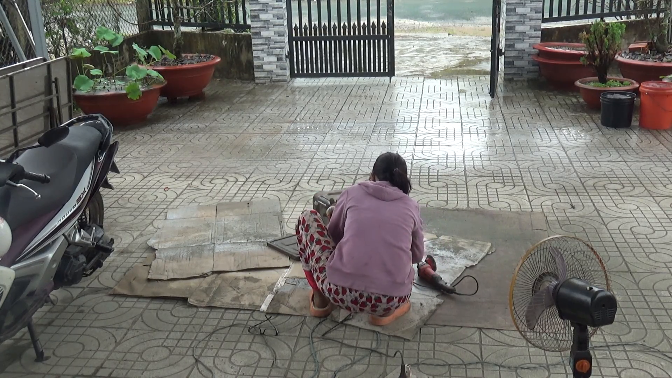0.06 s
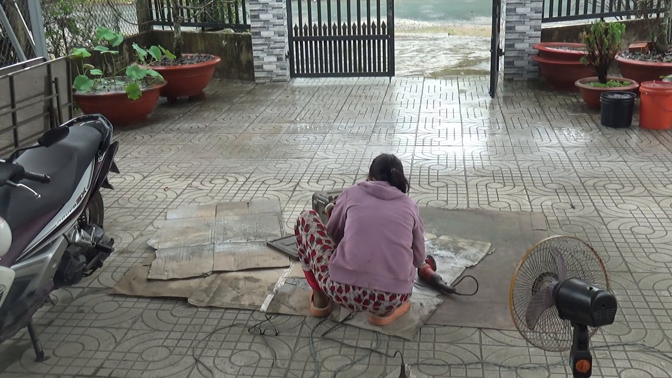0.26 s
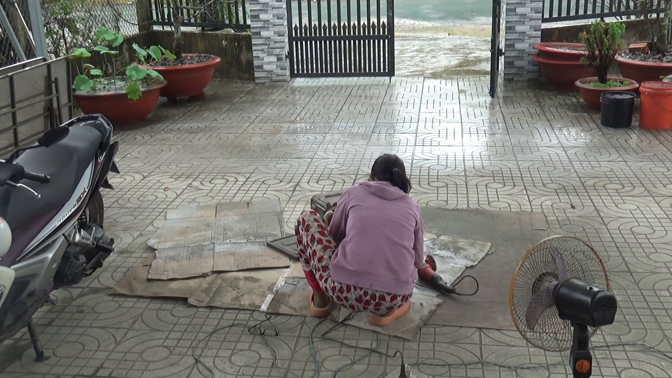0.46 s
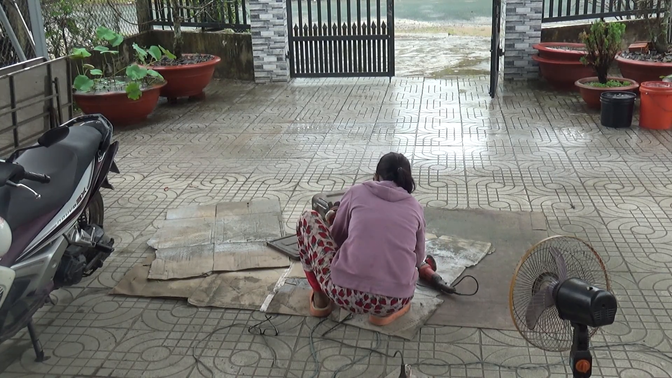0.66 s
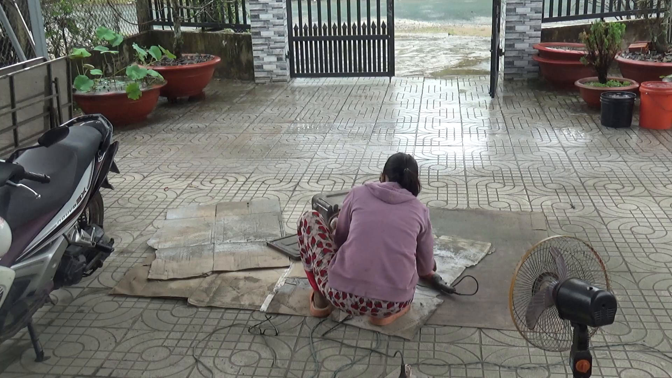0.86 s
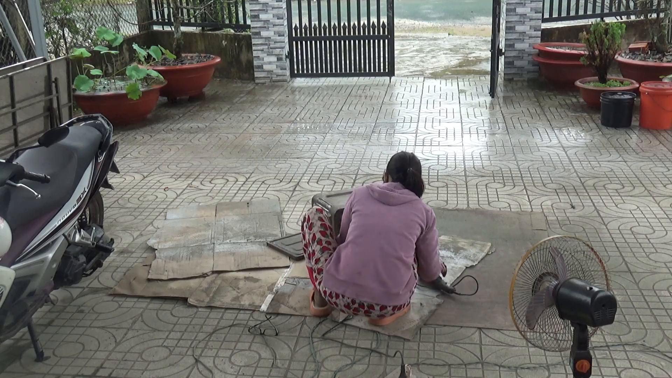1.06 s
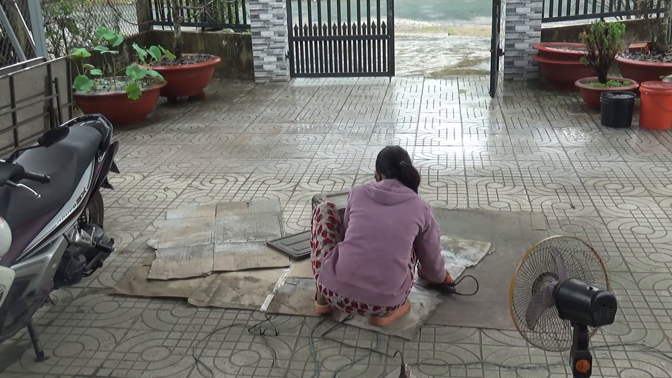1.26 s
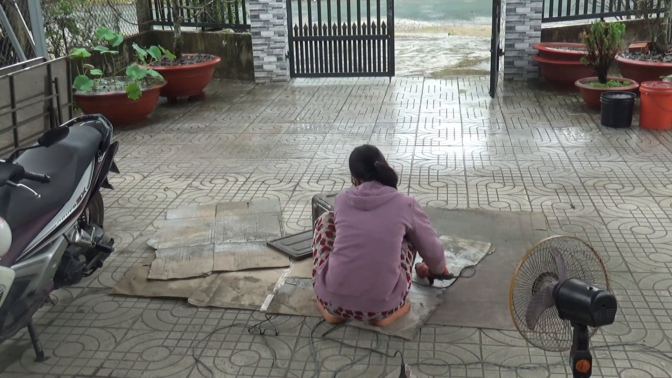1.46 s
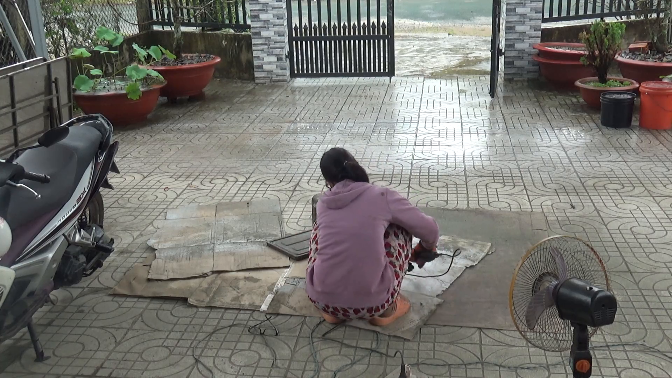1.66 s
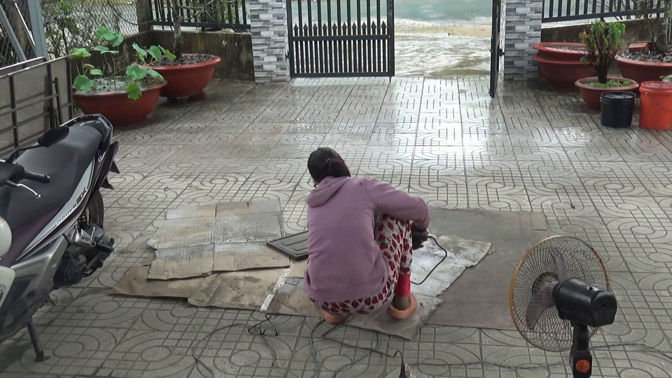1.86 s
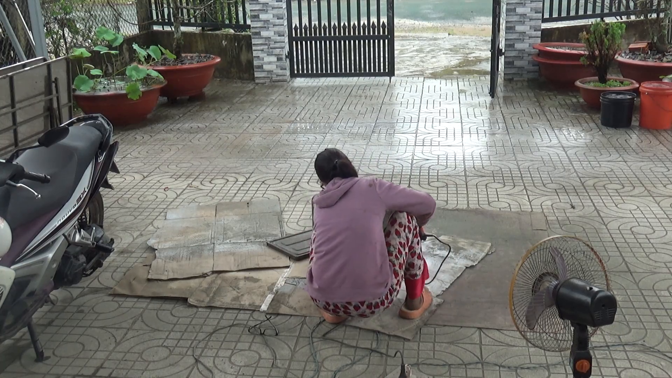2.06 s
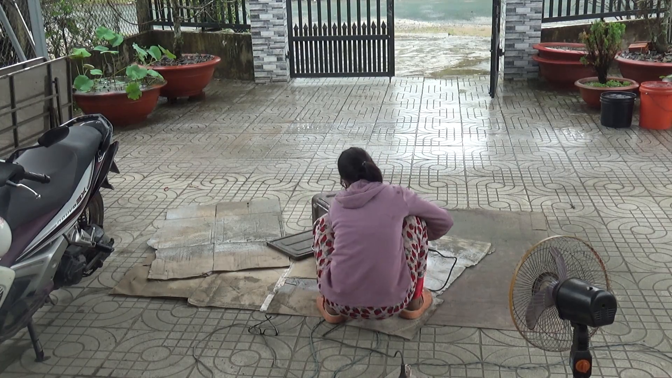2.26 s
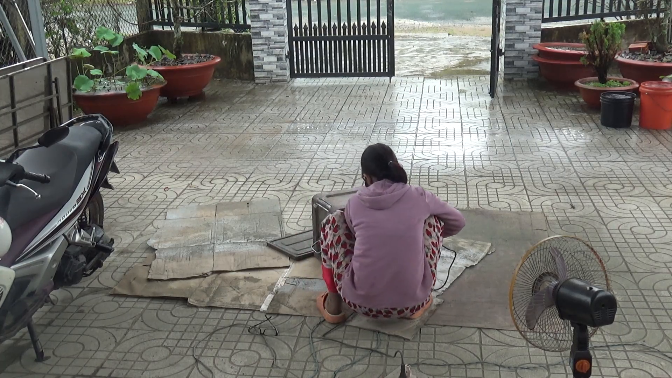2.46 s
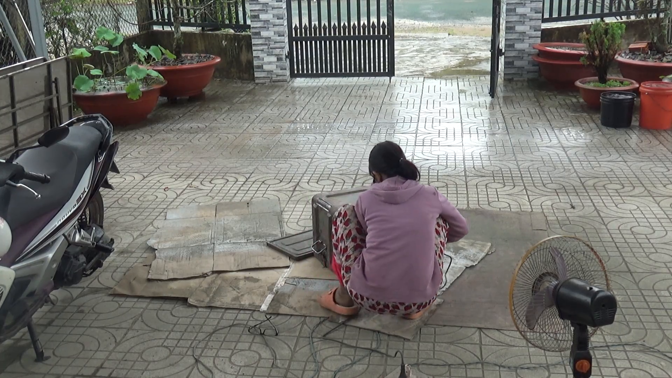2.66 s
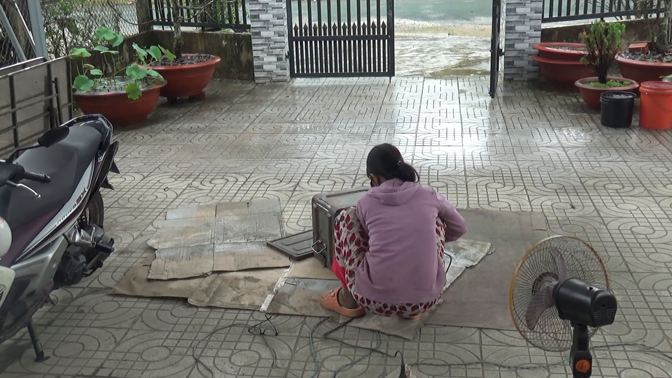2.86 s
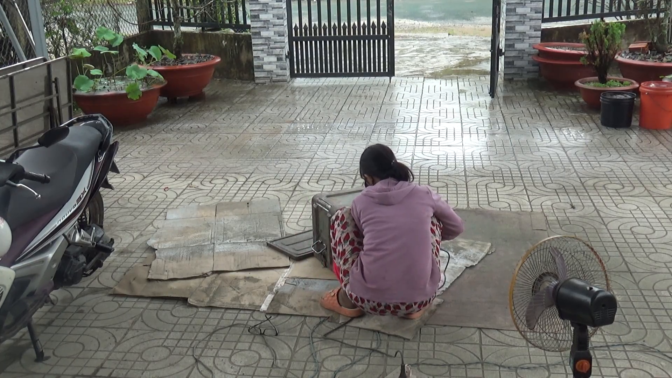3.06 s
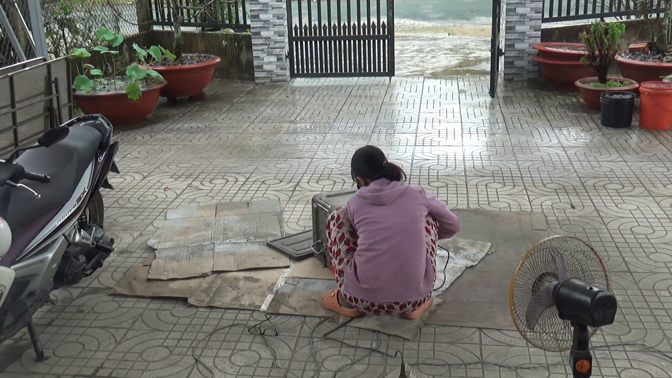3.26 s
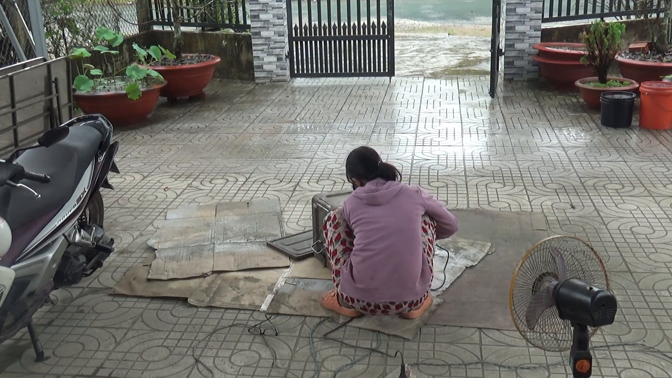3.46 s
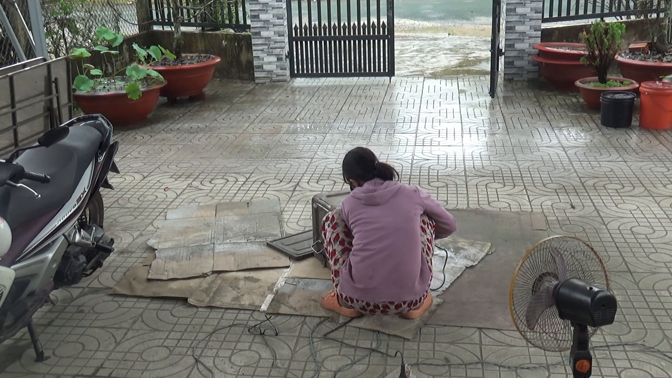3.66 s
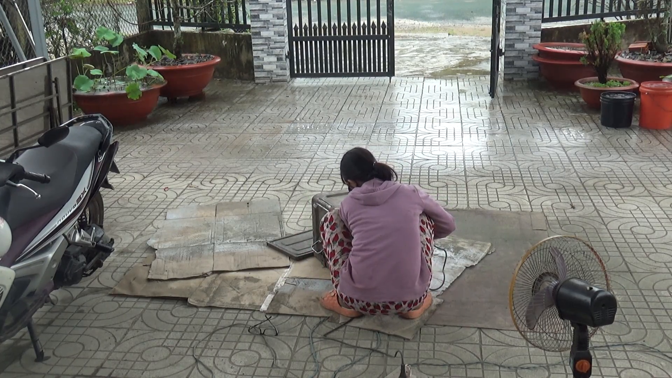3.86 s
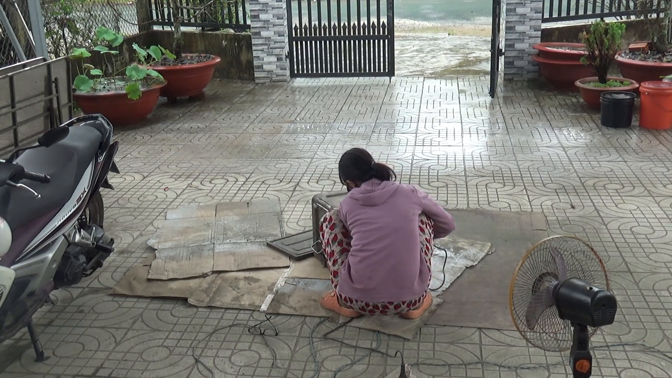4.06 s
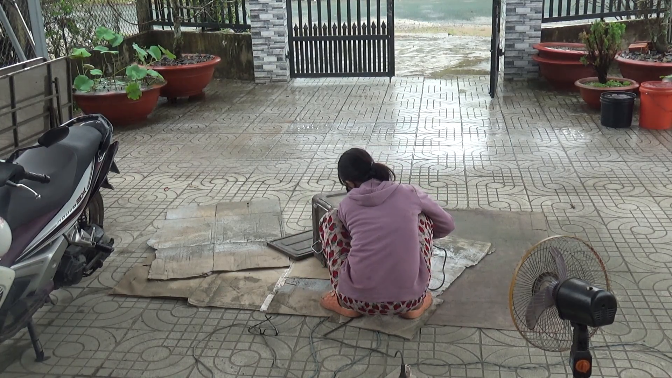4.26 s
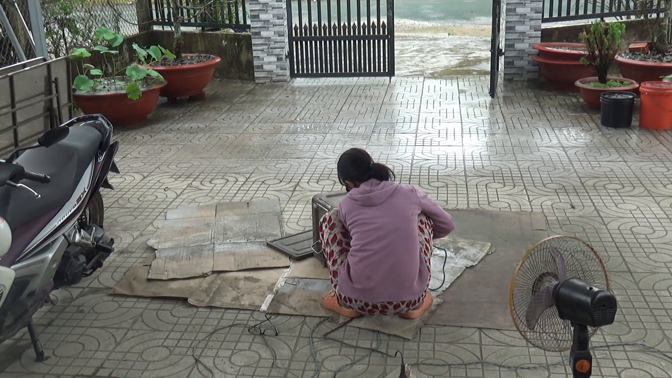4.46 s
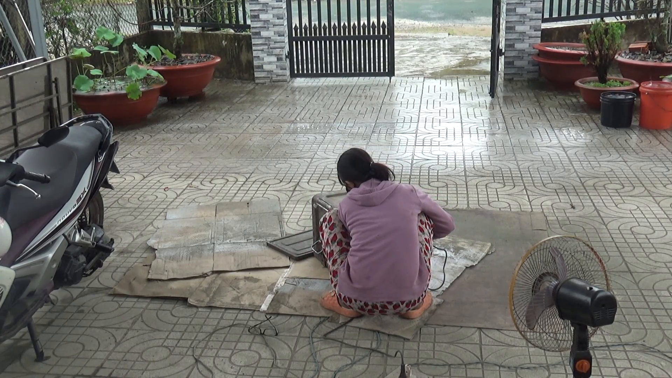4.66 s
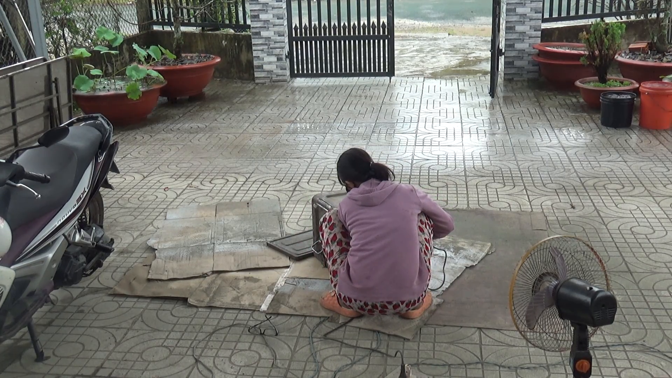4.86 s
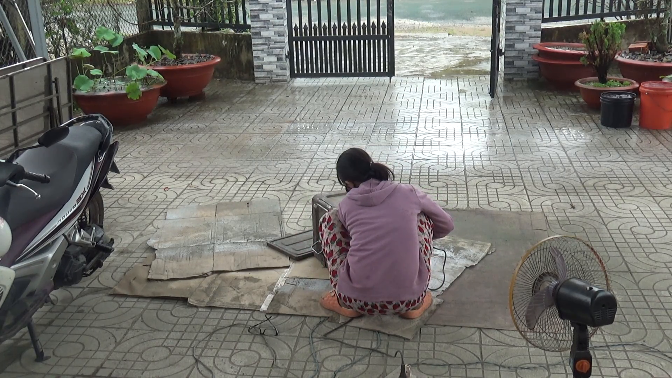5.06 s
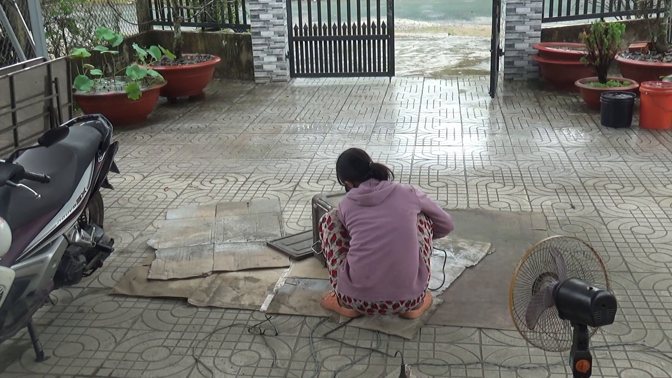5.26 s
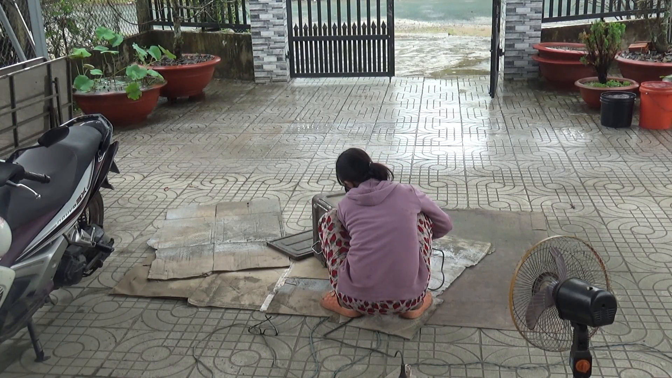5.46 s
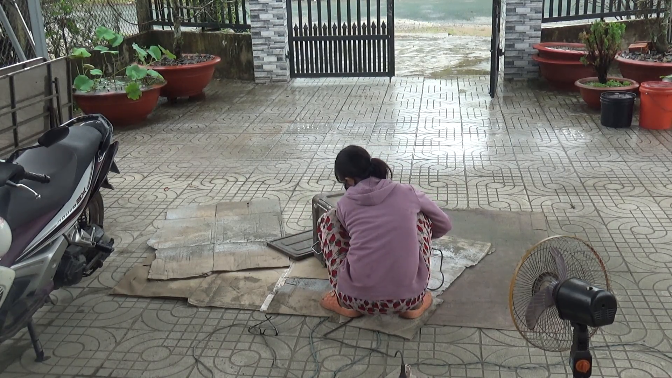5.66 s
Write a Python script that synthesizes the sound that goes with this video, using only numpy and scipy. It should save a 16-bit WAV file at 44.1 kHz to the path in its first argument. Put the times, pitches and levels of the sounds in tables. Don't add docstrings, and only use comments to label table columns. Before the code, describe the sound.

In a tiled yard, metal knocks and shuffling lead to a grinder starting, whining steadily, then biting steel with gritty, sagging bursts.

```python
import sys
import numpy as np
from scipy import signal
from scipy.fft import rfft, irfft, next_fast_len
from scipy.io import wavfile
from scipy.ndimage import uniform_filter1d, map_coordinates

SR = 44100
rng = np.random.default_rng(int(sys.argv[2]) if len(sys.argv) > 2 else 0)


def to_wav(s):
    ch = np.atleast_2d(s).T
    pcm = np.round(np.clip(ch, -1, 1) * 32767)
    wavfile.write(sys.argv[1], SR, pcm.astype(np.int16))


def ratio(d):
    e = np.asarray(d, float) / 20
    return 10 ** e


N = 251811
TIME_S = np.arange(N) / SR
GEAR = 31 / 10
TOUCH_S = 3.595


def unit(x):
    return x / np.sqrt(np.mean(x ** 2) + 1e-20)


def noise():
    return rng.standard_normal(N)


def along(points, hz):
    point_hz, value = np.transpose(points)
    return np.interp(np.log(hz + 1), np.log(point_hz + 1), value)


def curves(rows):
    s, *columns = np.transpose(rows)
    return [np.interp(TIME_S, s, column, -120) for column in columns]


def wobble(rate):
    return map_coordinates(rng.standard_normal(N // 32), [TIME_S * rate])


def filtered(x, response):
    m = next_fast_len(N + SR // 2)
    return irfft(rfft(x, m) * response(np.fft.rfftfreq(m, 1 / SR)), m)[..., :N]


def band(f, lo_hz, hi_hz):
    low_cut = 1 + np.sqrt(2) * lo_hz / (1j * f + 1e-9) - (lo_hz / (f + 1e-9)) ** 2
    high_cut = 1 + np.sqrt(2) * 1j * f / hi_hz - (f / hi_hz) ** 2
    return 1 / low_cut / high_cut


def modes(f, rows):
    total = 0
    for k, (hz, width, db) in enumerate(rows):
        total = total + (-1) ** k * ratio(db) * 1j * f * width / (hz * hz - f * f + 1j * f * width)
    return total


def patchy(x, depth_db, bins=6, frames=12):
    z = signal.stft(x, nperseg=512)[2]
    field = uniform_filter1d(rng.standard_normal(z.shape), bins, 0)
    field = uniform_filter1d(field, frames, 1)
    return signal.istft(z * ratio(depth_db * unit(field)), nperseg=512)[1][:N]


def split(x, colour, edges_hz, levels_db, order=14):
    def above(f, edge):
        return 1 / np.sqrt(1 + (edge / (f + 1)) ** order)

    def cut(lo, hi):
        return lambda f: colour(f) * above(f, lo) * above(hi, f)

    bands = zip(edges_hz, edges_hz[1:], levels_db)
    return sum(ratio(db) * unit(filtered(x, cut(lo, hi))) for lo, hi, db in bands)


def tone(turns, order, db, flutter_db=2, blur=0.23):
    level = np.sqrt(2) * ratio(db + flutter_db * wobble(18))
    return level * np.sin(2 * np.pi * order * turns + blur * wobble(40))


def gestures(s, db, rise_s, fall_s, hold_s=0):
    s, db, fall_s, hold_s = [np.reshape(v, (-1, 1)) for v in (s, db, fall_s, hold_s)]
    t = np.arange(0, N + 32, 32) / SR - s
    drop = np.maximum(-t, 0) / rise_s + np.maximum(t - hold_s, 0) / fall_s
    power = np.sum(ratio(db - 60 * drop) ** 2, axis=0)
    return np.interp(np.arange(N) / 32, np.arange(len(power)), 10 * np.log10(power + 1e-14))


# start_s, spindle_hz, shake_db
SPINDLE = [(2.34, 29.55, -76), (2.46, 81.5, -84), (2.6, 112.4, -66), (2.72, 126.2, -67), (2.84, 133.4, -67),
           (2.96, 141.5, -58), (3.16, 148.3, -54.5), (3.43, 155.1, -48), (3.6, 157.1, -51.5),
           (3.8, 151.7, -45), (4.04, 151.4, -48.5), (4.28, 150.9, -53.5), (4.76, 154.4, -47),
           (5.07, 148.2, -38.5), (5.28, 145, -44), (5.38, 138.1, -51), (5.63, 126.8, -51), (5.7, 127, -35)]


def spindle():
    speed, shake = curves(SPINDLE)
    speed = uniform_filter1d(np.clip(speed, 0, None), round(0.08 * SR), mode="nearest")
    return speed, np.cumsum(speed) / SR, shake


# mode_hz, width_hz, swell_db
ORDER_SWELLS = [(253, 7.7, 13), (271, 8.6, 16), (862.5, 29.5, 13.5), (908.6, 29, 11), (958, 31, 20.5),
                (1032.6, 32, 18)]
# mode_hz, width_hz, swell_db
ARMATURE_SWELLS = [(450.4, 11, 9)]


def order_levels(speed, shake):
    def swell(order, rows):
        return sum(db / (1 + (2 * (order * speed - hz) / width) ** 4) for hz, width, db in rows)

    running = np.where(TIME_S > SPINDLE[0][0], 0, -120)
    touch = TIME_S > TOUCH_S
    labour = touch * np.clip((141.5 - speed) / 5, 0, 1)
    armature = -47.5 + 0.14 * (speed - 150) + swell(GEAR, ARMATURE_SWELLS)
    armature = armature - 0.6 * np.clip(110 - speed, 0, None) - 5 * labour
    rough_db = 5.5
    second = -62 + 0.5 * (shake + 50) + touch * swell(1.995, ORDER_SWELLS) + rough_db * wobble(7)
    sixth = -56 + swell(6, ORDER_SWELLS) + rough_db * wobble(9)
    sag_hz = np.clip(150 - speed, 0, 15)
    seventh = -57 + 0.5 * sag_hz + swell(7, ORDER_SWELLS) + rough_db * wobble(9)
    return [running + db for db in (second, armature, sixth, seventh)]


# start_s, effort_db
EFFORT_CURVE = [(2.34, -56), (2.355, -43), (2.4, -36), (2.45, -30), (2.59, -32), (3.49, -31), (3.65, -28),
                (4.07, -30), (4.14, -25.5), (4.24, -31.5), (4.6, -30.5), (5.19, -25.5), (5.39, -27),
                (5.52, -30.5), (5.59, -27.5), (5.71, -32)]


def motor_levels(speed):
    gears, = curves(EFFORT_CURVE)
    since_s = np.clip(TIME_S - EFFORT_CURVE[0][0], 0, None)
    start = 20 * np.log10(1 - np.exp(-since_s / 0.0082) + 1e-6)
    effort = np.clip(gears + 30, -6, None)
    housing = -35.5 + 0.14 * np.clip(speed - 150, -60, 0) + 0.47 * effort + start
    air = -33.5 + 0.24 * effort + start
    hiss = -38 + 0.31 * effort + start
    return housing, air, gears, hiss


# tone_hz, level_db
MOTOR_COLOUR = [(35, -64), (60, -36), (142, -15), (197, -22), (404, -15.5), (465, -9), (535, -6.5),
                (1050, -2.5), (1320, 0), (1560, -9), (2600, -5.5), (3860, -6), (4440, -2.5), (8720, -12.5),
                (15600, -22)]
# mode_hz, width_hz, level_db
CASING_MODES = [(248, 10.54, 5), (1360, 150, -13.5), (1975, 45, -1.5), (2440, 500, -4), (5140, 9.8, 6.5),
                (6035, 5, 13), (8750, 49, -7)]
# start_s, level_db
FAN_WHINE = [(2.55, -80), (2.64, -56), (2.74, -46), (2.9, -57), (3.15, -54), (3.5, -61), (3.7, -72),
             (5.7, -74)]


def motor(speed, turns, armature_db):
    housing, air, gears, hiss = motor_levels(speed)

    def colour(f):
        return ratio(along(MOTOR_COLOUR, f)) * (1 + abs(modes(f, CASING_MODES)))

    top = hiss - 8 + 0.16 * (speed - 150)
    levels = [housing - 1, air, gears - 3, hiss, top]
    rush = split(patchy(noise(), 0.64), colour, [60, 1650, 3500, 5500, 9000, 18000], levels)
    lines = tone(turns, GEAR, armature_db)
    lines = lines + tone(turns, 2 * GEAR, np.minimum(armature_db, -47) - 1, 0.8)
    lines = lines + tone(turns, 5 * GEAR, armature_db / 2 - 27, 3.3)
    mesh = tone(turns, 31, gears - 11, 4, 0.7)
    mesh = mesh + tone(turns, 31, gears - 5, 0, 0) * unit(wobble(450))
    mesh = mesh + tone(turns, 62, gears - 3, 0, 0) * unit(wobble(900))
    gearbox = lambda f: modes(f, [(4700, 2300, 0)]) * band(f, 1660, 10500) ** 2
    whine = tone(turns, 31 * GEAR, curves(FAN_WHINE)[0], 2.5, 0.7)
    return rush + lines + filtered(mesh, gearbox) + whine


# start_s, hold_s, panel_db, grit_over_panel_db, sparkle_over_panel_db
BITES = [
    (3.631, 0.092, -27, 5, -17),
    (3.766, .03, -34, 4.5, 2),
    (3.955, 0.027, -28, -4.5, -1),
    (4.102, 0.056, -28, 4.5, -9),
    (4.376, 0.051, -30.5, 7.5, -22),
    (4.63, 0.074, -41, -9, -5),
    (4.9, 0.075, -32, -34, -29),
    (5.315, 0.042, -19.5, 0, -27),
    (5.409, .03, -21, -11, -9),
    (5.587, 0.039, -21, -9, -11),
]
# panel_db, grit_db, sparkle_db
RESTING_DB = [-34.5, -58, -46.5]


def contact():
    s, hold, panel, grit, sparkle = np.transpose(BITES)
    landing = np.clip(60 * (TIME_S - TOUCH_S) / 0.16, None, 0)
    levels = []
    for over, rest in zip([0, grit, sparkle], RESTING_DB):
        moves = gestures([*s, s[0]], [*(panel + over), rest], 0.38, 0.48, [*hold, 9])
        levels.append(landing + moves)
    return levels


def surface(turns, memory, size=300):
    fresh = rng.standard_normal((700, size))
    rim = signal.lfilter([1], [1, -memory], fresh, axis=0)
    return map_coordinates(rim.ravel(), [(turns + 30) * size])


# tone_hz, level_db
GRIND_COLOUR = [(5000, -4.5), (5900, -5), (6900, -4.5), (8000, -3.5), (9500, -1), (10800, 4.5), (12400, 8),
                (13100, 2.5), (14300, 5), (15000, 5), (15800, -21)]
# mode_hz, width_hz, level_db
PANEL_MODES = [(5830, 25, 7), (5920, 25, 5), (6440, 25, 3), (6650, 30, 3), (6820, 30, 6), (7200, 30, 3),
               (9317, 25, 5), (9861, 20, 5), (10210, 20, 5), (10434, 18, 5), (10817, 30, 6), (11078, 20, 5),
               (11973, 20, 5), (12197, 30, 6), (12490, 40, 6), (14100, 30, 2), (14500, 40, 2)]


def disc(speed, turns, first, second, sixth, seventh):
    levels = contact()
    touch = levels[0] > -60
    beat = tone(turns, 0.99, first) + tone(turns, 2, second)
    beat = beat + touch * (tone(turns, 6, sixth) + tone(turns, 7, seventh))
    load = (np.maximum(sixth, seventh) + np.minimum(first, -44)) / 2
    for order, db in [(4, -4.5), (5, -5.5), (8, 1), (9, -7), (11, -2), (12, -2.5)]:
        beat = beat + touch * tone(turns, order, load + db, 2.1)
    bite = ratio(0.37 * np.cos(2 * np.pi * turns) + 0.25 * wobble(30))
    kept = np.clip((speed - 128) / 22, 0.3, 1)
    rim = kept * unit(surface(turns, memory=0.7)) + np.sqrt(1 - kept ** 2) * noise()
    grit = patchy(bite * rim, 1.3, bins=16, frames=20)

    def colour(f):
        return ratio(along(GRIND_COLOUR, f)) * (1 + abs(modes(f, PANEL_MODES)))

    return beat + split(grit, colour, [5150, 8310, 13050, 18000], levels)


def switch():
    t = TIME_S - 2.3415
    snap = (t > 0) * ratio(-25 - 60 * np.abs(t) / 0.027) * noise()
    return filtered(snap, lambda f: band(f, 260, 6400) ** 2)


# mode_hz, width_hz, level_db
BOX_MODES = [(253, 20, 0), (355, 18, -8), (480, 18, -5), (544, 28, 2), (615, 12, -5), (760, 20, -9),
             (958, 25, 0), (1130, 18, -1), (1300, 70, -8), (1970, 40, -10), (2300, 120, -14)]


def steel(f):
    return (modes(f, BOX_MODES) + 0.13 * band(f, 300, 1300)) * band(f, 170, 6000)


# start_s, level_db, dies_s, boom_over_level_db, scrape_over_level_db
BOX_MOVES = [(.07, -38.5, .5, -22, -12), (.092, -32, 0.27, -18, -20), (0.107, -25, 0.29, -18, -5),
             (.15, -36.5, 0.64, -14, 0.5), (.275, -39, 0.23, -22, -7), (.368, -46, 0.67, -11, -18),
             (.42, -55, .3, 5, -7), (0.452, -39, 0.52, 0.5, -7), (.5, -39, 0.94, -14, -11),
             (.57, -49, 0.42, -3, -8), (.702, -49, 0.68, -5, -2.5)]
# tone_hz, level_db
SCRAPE_COLOUR = [(880, -28), (1500, 1), (1640, -2), (1920, -0.5), (2920, -8.5), (3210, -6), (5090, -7),
                 (9420, -20), (15500, -57)]


def box_drag():
    s, db, dies, boom_over, scrape_over = np.transpose(BOX_MOVES)
    boom, lid, scrape = [gestures(s, db + over, 0.032, dies) for over in (boom_over, 0, scrape_over)]
    grains = noise() * ratio(2.5 * wobble(91.2))
    ring = split(grains, steel, [150, 720, 1800], [lid - 3, lid - 3])
    hollow = filtered(noise(), lambda f: modes(f, [(131, 38, 0)]) ** 2 * band(f, 95, 200))
    raw = filtered(grains, lambda f: ratio(along(SCRAPE_COLOUR, f)))
    return ring + ratio(boom) * unit(hollow) + ratio(scrape + 1.5) * unit(raw)


# start_s, peak_db, treble_db
BLOWS = [(0.066, -25, -24), (0.085, -15.5, -39), (0.105, -16.5, -8.5), (0.132, -18, -1.5),
         (0.262, -21.5, -29), (0.372, -23.5, -29), (0.45, -26, -19), (0.496, -22, -25), (0.698, -29, -16),
         (1.434, -44, 5), (1.556, -42, -15), (1.608, -45, -9), (1.863, -48, 1), (1.997, -33, -2.5),
         (2.024, -42, -20)]


def box_knocks():
    body, treble = np.zeros((2, N + SR))
    t = np.arange(SR // 10) / SR
    for s, db, treble_db in BLOWS:
        start = round(s * SR)
        crack = ratio(db - 60 * t / 0.079) * rng.standard_normal(len(t))
        body[start:][:12] += ratio(db + 17) * np.hanning(12)
        body[start:][:len(t)] += crack * ratio(-6)
        treble[start:][:len(t)] += crack * ratio(treble_db)
    return filtered(body[:N], steel) + filtered(treble[:N], lambda f: band(f, 2200, 8300) ** 3)


# start_s, thud_db, dies_s, crinkle_over_thud_db
SHEET_MOVES = [(.01, -49, .6, -11), (.984, -58, 1.3, -5), (1.409, -53, 0.22, 1.5), (1.564, -51.5, 0.56, -6),
               (1.618, -47.5, 0.46, -5), (1.74, -51, 0.47, -10), (1.862, -54.5, .7, -1),
               (2.002, -45, 0.34, -6.5), (2.06, -63, 0.83, -7), (2.23, -56, .8, -15), (2.306, -53, .1, -10)]


def cardboard():
    s, db, dies, crisp = np.transpose(SHEET_MOVES)
    thud, crinkle = [gestures(s, db + over, 0.11, dies) for over in (0, crisp)]
    clumps = noise() * ratio(2.2 * wobble(150))
    sheet = lambda f: 0.35 + abs(modes(f, [(1200, 520, 9), (8400, 3400, -11)]))
    return split(clumps, sheet, [600, 2400, 11500], [thud - 1, crinkle + 2])


# start_s, pitch_hz, end_pitch_hz, level_db
BIRD_CALLS = [
    (1.735, 4730, 4200, -51),
    (1.738, 5750, 5700, -57),
    (1.765, 4700, 4870, -56),
    (1.93, 5700, 5700, -54),
]


def bird():
    out = np.zeros(N)
    length = 800
    for s, hz, end_hz, db in BIRD_CALLS:
        phase = 2 * np.pi * np.cumsum(np.linspace(hz, end_hz, length)) / SR
        out[round(s * SR):][:length] += ratio(db) * np.hanning(length) * np.sin(phase) * 2
    return out


# tone_hz, level_db
YARD_COLOUR = [(36, -39), (62, -19), (139, -15.5), (299, -8), (703, -8.5), (754, -7), (827, -5), (886, -6),
               (5510, -14.5), (15600, -36.5)]


def yard():
    colour = [(20, -38)] + YARD_COLOUR[1:]
    air = unit(filtered(patchy(noise(), 0.35), lambda f: ratio(along(colour, f))))
    hum = ratio(-72) * np.sin(2 * np.pi * 50 * TIME_S)
    return ratio(-49 + 0.6 * wobble(3)) * air + hum


# tone_hz, t60_s
WALL_DECAY = [(200, 0.17), (2000, 0.5), (10000, 0.069)]


def walls(x):
    hz, t, z = signal.stft(rng.standard_normal(SR // 2), SR, nperseg=256)
    decay = ratio(-60 * t / along(WALL_DECAY, hz)[:, None])
    tail = signal.istft(z * decay, SR, nperseg=256)[1]
    return signal.fftconvolve(np.pad(x, (500, 0)), tail / np.linalg.norm(tail))[:N]


# tone_hz, side_db
STEREO_WIDTH = [(100, -27), (600, -23.5), (1300, -29), (2100, -16), (4000, -9.5), (8000, -5), (14000, -4.5)]
# tone_hz, left_minus_right_db
PORT_LEAN = [(30, -.3), (70, -1.7), (350, -1.4), (700, -.6), (1400, -.1), (2800, -.5), (5500, -1),
             (11000, -1.8)]


def two_ports(mid):
    scatter = rng.standard_normal(12000) * ratio(-60 * np.arange(12000) / SR / 0.5)
    side = signal.fftconvolve(mid, scatter / np.linalg.norm(scatter))[:N]
    side = filtered(side, lambda f: ratio(along(STEREO_WIDTH, f)))
    lean = lambda f: ratio(along(PORT_LEAN, f) / 2 * [[1], [-1]])
    return filtered(np.array([mid + side, mid - side]), lean)


def scene():
    speed, turns, first = spindle()
    second, armature, sixth, seventh = order_levels(speed, first)
    grinder = motor(speed, turns, armature) + disc(speed, turns, first, second, sixth, seventh) + switch()
    knocks = box_knocks()
    box = box_drag() + knocks + ratio(-11.5) * walls(knocks)
    return two_ports(grinder + box + cardboard() + bird() + yard())


def band_limit(x):
    return signal.sosfilt(signal.butter(12, 16330, fs=SR, output="sos"), x)


def record(dry):
    mix = filtered(dry, lambda f: f < 15750)
    return band_limit(mix)


dry = scene()
out = record(dry)
to_wav(out)
```